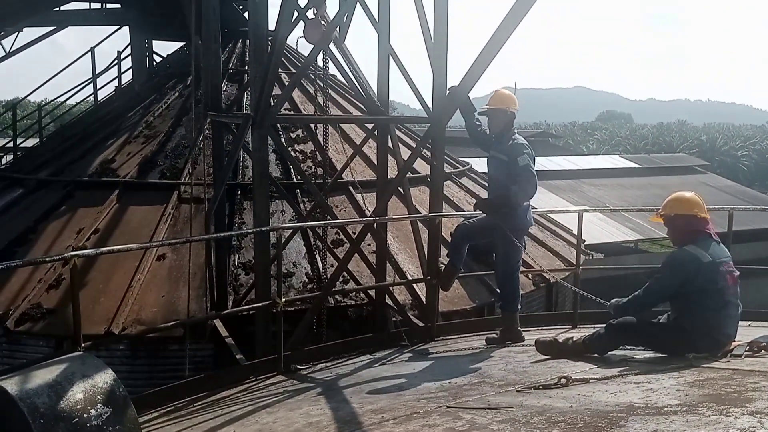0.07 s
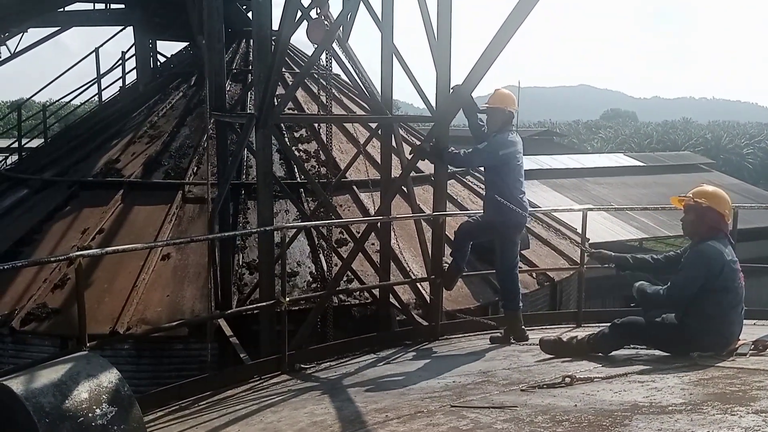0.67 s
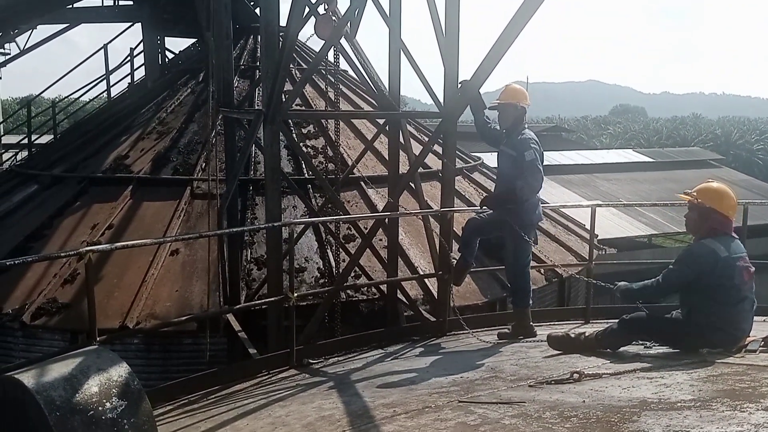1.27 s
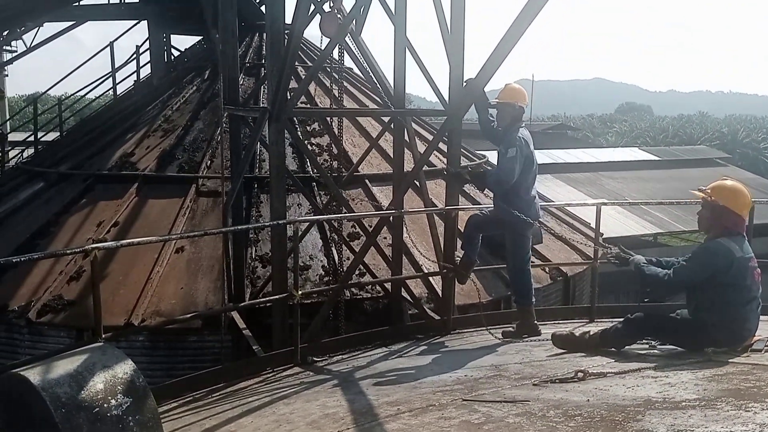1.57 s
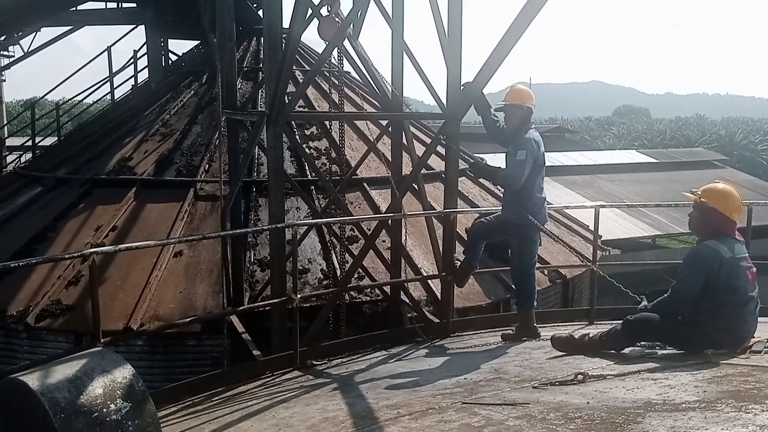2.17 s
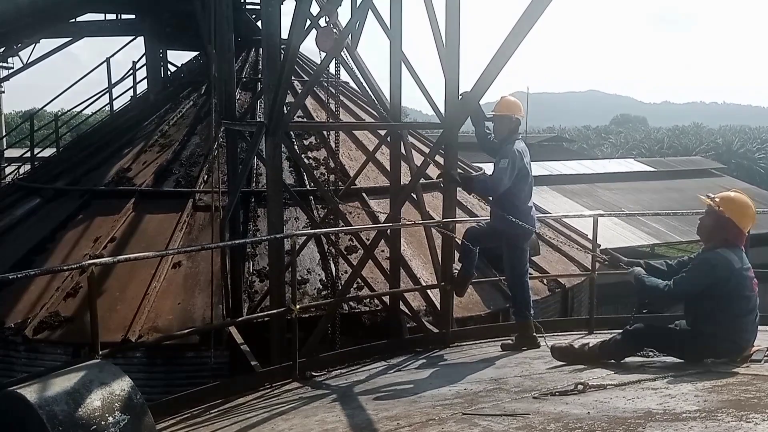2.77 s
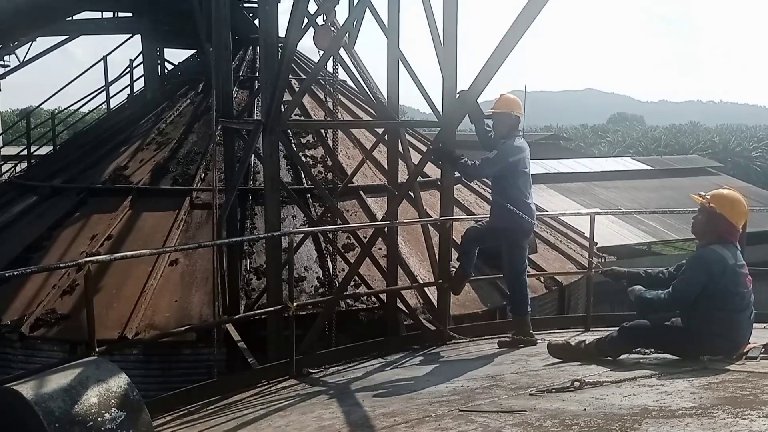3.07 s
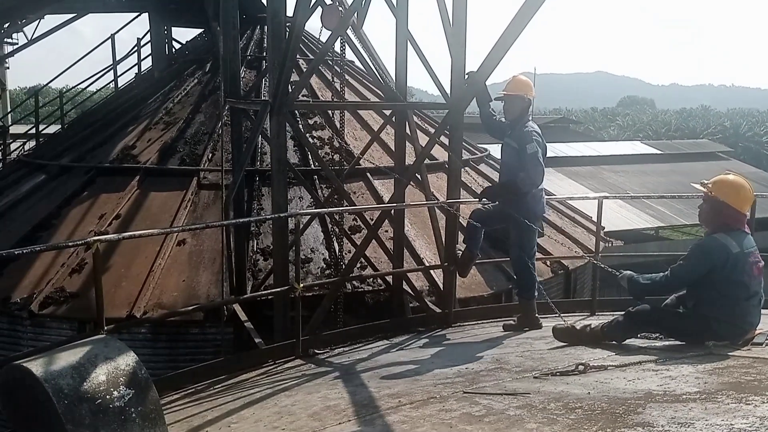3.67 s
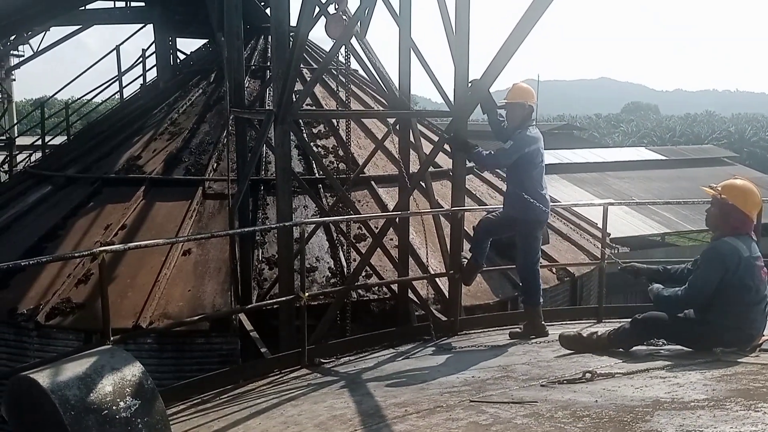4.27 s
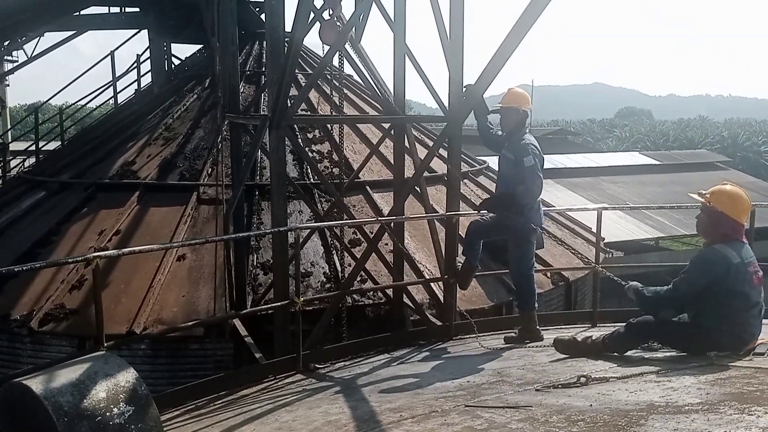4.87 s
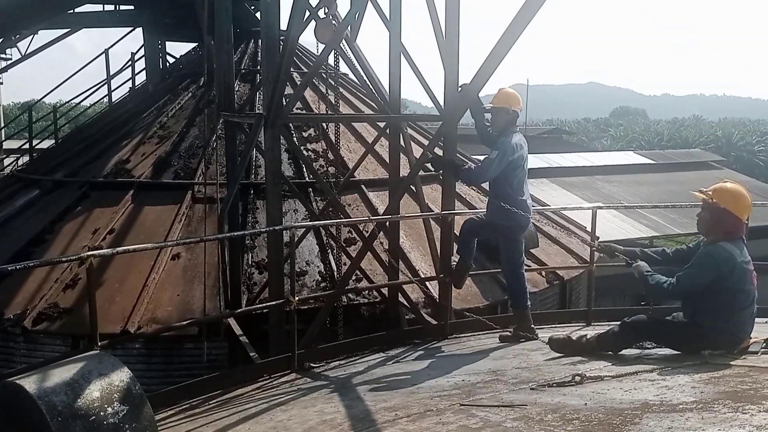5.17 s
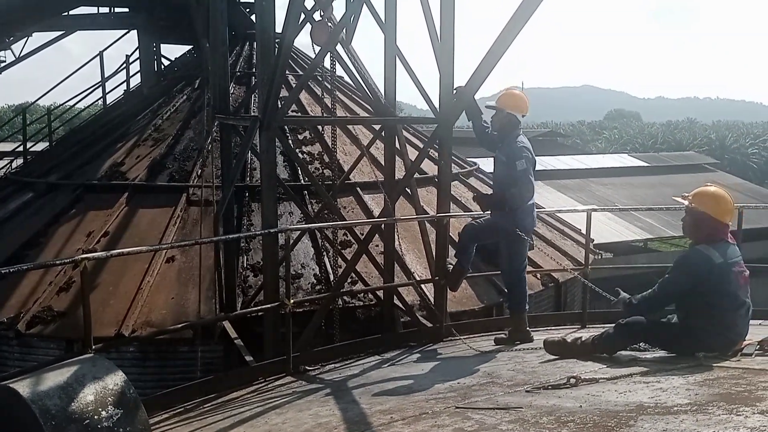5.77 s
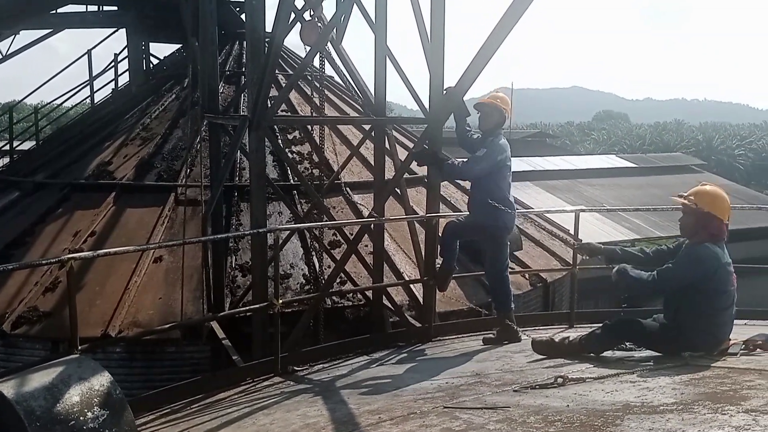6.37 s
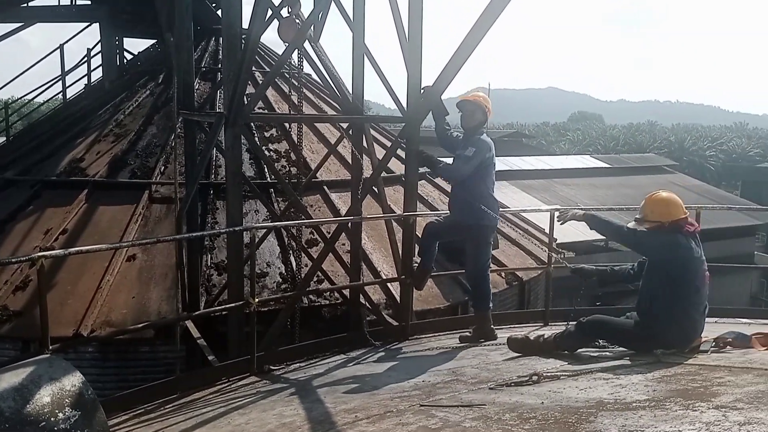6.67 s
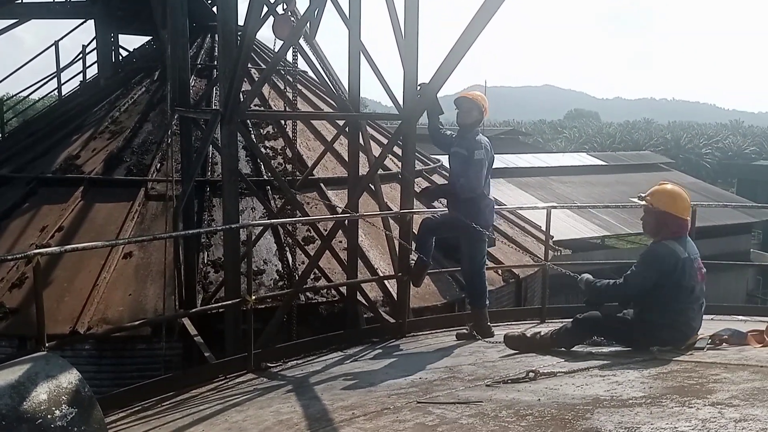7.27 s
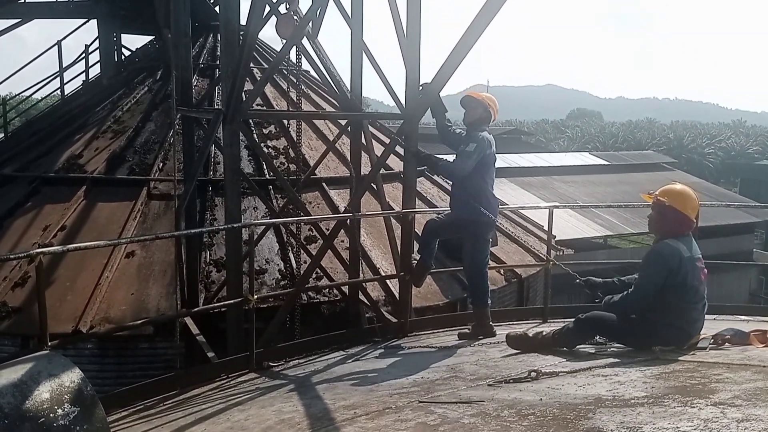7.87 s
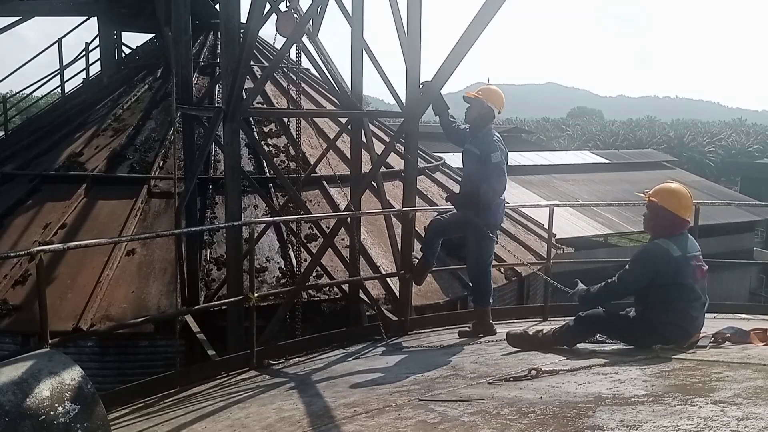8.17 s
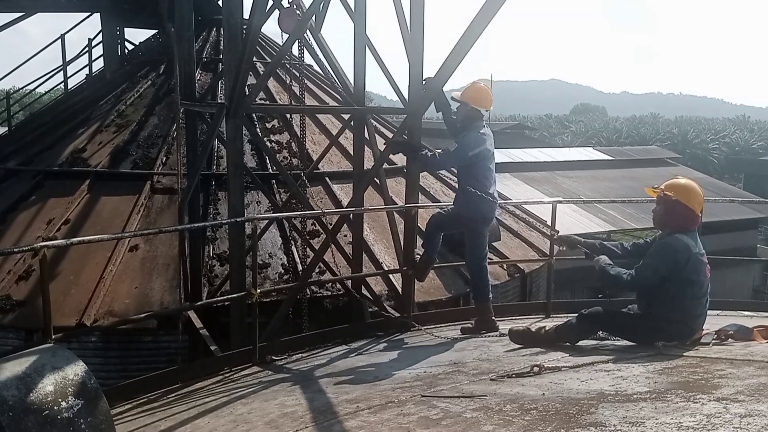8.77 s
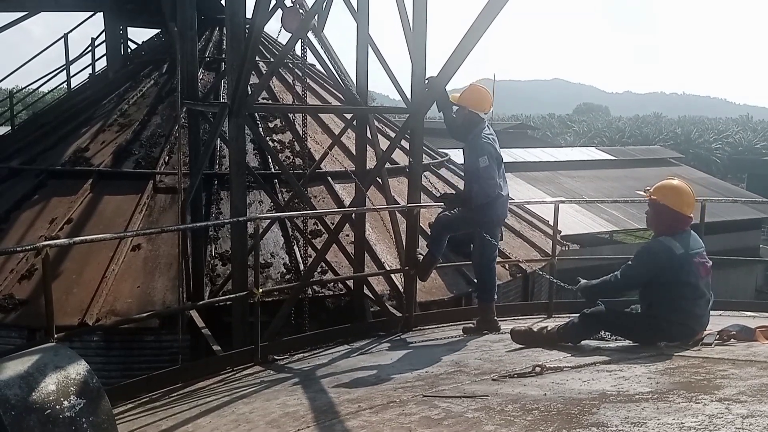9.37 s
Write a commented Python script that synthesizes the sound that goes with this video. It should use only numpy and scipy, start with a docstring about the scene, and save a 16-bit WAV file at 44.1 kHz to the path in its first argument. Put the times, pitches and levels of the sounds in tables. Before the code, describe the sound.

A chain hoist clatters in short bursts about once a second, with loose links clinking between pulls and faint machinery outdoors.

```python
"""A chain hoist on a steel rooftop, two workers hauling its hand chain about once a second.
In each pull a dense stream of links clatters over the wheel and shakes the housing;
between pulls the slack chain clinks and single links ring on.
One microphone in the open air, bumped by light wind, with machinery humming faintly far off."""
import sys
import numpy as np
from scipy import signal
from scipy.fft import rfft, irfft, next_fast_len
from scipy.io import wavfile
from scipy.ndimage import uniform_filter1d

SR = 44100
rng = np.random.default_rng(int(sys.argv[2]) if len(sys.argv) > 2 else 0)


def to_wav(sig):
    """Store sig (one row per channel, or 1-D mono) as 16-bit WAV at the path in sys.argv[1].

    Samples outside -1..1 are clipped; the rate is SR.
    """
    pcm = np.clip(np.atleast_2d(sig), -1, 1) * 32767
    pcm = np.round(pcm).astype(np.int16)
    wavfile.write(sys.argv[1], SR, pcm.T)  # frames by channels


N = 415422
TIME = np.arange(N) / SR

# Hauls on the chain. Each row: bite time, take-up before it, swell and haul, all in seconds; slowing in
# dB per second; then in dB the clatter, snap at the bite, sag after it, housing, low note and jingle
# (these three relative to the clatter) and growth of the jingle.
PULLS = [(-.35, 0.088, .008, 0.42, 169.5, -26.5, -24, 3, -3, -5, -2.5, 5),
         (.916, 0.036, .004, .31, 162, -29, -34, -2, -3, -4, -2, 5),
         (2.005, 0.12, .02, 0.4, 215, -26, -23, 3, -7.5, -6.5, -4, 8.5),
         (3.209, 0.088, 0.0032, 0.33, 209, -27.5, -17, 1, -4, -8.5, -21, -9.5),
         (4.284, .14, 0.012, 0.45, 108.5, -25, -18.5, 3.5, -8, -7.5, -17, 10),
         (5.449, 0.1, 0.044, 0.38, 207, -25.5, -26.5, 2.5, -7.5, -8, -14, 26),
         (6.653, .01, .005, 0.4, 171, -29, -17.5, 3.5, -3.5, -7.5, -6.5, 6),
         (7.819, .01, 0.0093, 0.38, 141, -26.5, -19.5, 3, -6, -7.5, -15.5, 9.5),
         (9.079, 0.09, 0.023, 0.45, 143, -25, -26.5, 0, -10.5, -8.5, -1, 20.5)]
# The crowd of weak modes in a link's low note, mid clatter and high jingle.
# Each row: frequency in Hz, relative spectral level in dB.
NOTE_WASH = [(2400, -67), (2800, -0.5), (2980, 11.5), (3250, 10), (3500, 7), (4200, -61.5)]
LINK_WASH = [(2800, -37.5), (3700, 5), (4500, 4.5), (6000, 9), (7300, 7.5), (7900, -1.5), (8600, -32),
             (12000, -27)]
JINGLE_WASH = [(6500, -25), (7900, -11), (8250, 18.5), (8900, -5.5), (9350, 7), (9750, -18), (10400, -7.5),
               (13000, -67)]
# A link's highest modes. Each row: frequency in Hz, relative level in dB.
JINGLE_MODES = [(8225, 19.5), (8360, -28), (8833, 27), (8925, -5), (9226, 16.5), (9270, -27), (9700, 14),
                (9781, -62)]


def amp(db):
    """Decibels to gain."""
    return 10 ** (np.asarray(db) / 20)


def rms_one(x):
    """Scale to rms 1."""
    return x / np.sqrt(np.mean(x ** 2) + 1e-20)


def energy_one(x):
    """Scale each row to energy 1."""
    return x / np.sqrt(np.sum(x ** 2, axis=-1, keepdims=True) + 1e-20)


def coloured(x, spectrum):
    """Causal (minimum-phase) filter that follows rows of frequency in Hz and gain in dB."""
    length = x.shape[-1]
    size = next_fast_len(length + SR // 20)
    hz, db = np.transpose(spectrum)
    log_hz = np.log(np.abs(np.fft.fftfreq(size, 1 / SR)) + 1)
    log_gain = np.log(amp(np.interp(log_hz, np.log(hz), db)))
    response = np.exp(np.conj(signal.hilbert(log_gain)))[:size // 2 + 1]
    return irfft(rfft(x, size) * response, size)[..., :length]


def background(hush_db=-55.5, swell_db=3.5, swell_s=.13, hiss_from_hz=2800):
    """Outdoor hush with the hums and whines of far machinery, each swelling and fading on the breeze."""
    # The rooftop's hush. Each row: frequency in Hz, relative spectral level in dB.
    hush = [(60, -42), (130, -0.5), (220, 1.5), (400, -2.5), (600, -8), (900, -8.5), (2500, -10.5),
            (3100, -14.5), (3700, -16.5), (7000, -19.5), (9000, -30), (11500, -54), (14000, -46),
            (15000, -76)]
    # Far machinery. Each row: pitch in Hz, bandwidth in Hz, base level in dB.
    whines = [(229.7, 16, -65), (270, 45, -65), (344, 24, -68.5), (430, 13, -73), (507, 17, -68),
              (597, 20, -70.5), (692, 15, -74.5), (3149, 50, -69), (4660, 9.3, -88), (5420, 17, -76)]
    # The treble hiss drifts. Each row: time in seconds, boost in dB.
    hiss = [(.4, 1), (1.6, 6.5), (3, 4), (3.9, 5), (6.1, 5), (7.3, 6), (8.5, 2.5), (9.42, 9)]
    air = amp(hush_db) * rms_one(coloured(rng.standard_normal(N), hush))
    for hz, width_hz, db in whines:
        resonance = signal.iirpeak(hz, hz / width_hz, fs=SR)
        tone = rms_one(signal.lfilter(*resonance, rng.standard_normal(N)))
        swell = np.interp(TIME / swell_s, np.arange(400), rng.standard_normal(400))
        air += amp(db + swell_db * swell) * tone
    treble = signal.sosfilt(signal.butter(1, hiss_from_hz, "high", fs=SR, output="sos"), air)
    treble_gain = amp(np.interp(TIME, *np.transpose(hiss)))
    return air + (treble_gain - 1) * treble


def wind(swing_db=2.5, swing_s=0.068):
    """Low, lumpy turbulence on the microphone port: a wandering breeze and a few gusts."""
    # Rumble at the port. Each row: frequency in Hz, relative spectral level in dB.
    rumble = [(15, -33), (25, -37), (62, 1.5), (92, 5.5), (162, -4.5), (194, -12), (279, -13), (300, -65),
              (390, -59), (660, -120)]
    # Gusts bump the microphone. Each row: peak time in seconds, level in dB, half-length in seconds.
    bumps = [(.01, -50.5, 0.17), (0.491, -40.5, 0.057), (1.366, -37.5, 0.04), (2.03, -43.5, 0.035),
             (2.672, -47, .03), (3.042, -41, 0.037), (3.918, -48, .07), (5.217, -35, 0.029),
             (5.312, -42, 0.043), (5.46, -40, 0.056), (5.698, -48.5, 0.11), (8.66, -49, .04)]
    # Light air between gusts. Each row: time in seconds, level in dB.
    light_air = [(0, -57), (3.2, -58.5), (4.1, -54.5), (5.9, -54), (6.6, -63.5), (7.8, -53.5), (8.7, -61.5),
                 (9.42, -63)]
    eddies = rms_one(coloured(rng.standard_normal(N), rumble))
    wander = np.interp(TIME / swing_s, np.arange(600), rng.standard_normal(600))
    breeze = amp(np.interp(TIME, *np.transpose(light_air)) + swing_db * wander)
    gusts = sum(amp(db) * np.exp(-np.minimum(((TIME - s) / half_s) ** 2, 20)) for s, db, half_s in bumps)
    eddy_rms = np.sqrt(uniform_filter1d(eddies ** 2, int(.09 * SR)))
    return np.hypot(breeze, gusts) * eddies / eddy_rms


def contacts(per_s, spread_db, even_s):
    """Random link-on-steel clicks, their power evened out to about 1 over even_s."""
    hits = rng.random(N) < per_s / SR
    clicks = hits * amp(spread_db * rng.standard_normal(N)) * rng.choice([-1, 1], N)
    return clicks / np.sqrt(np.abs(uniform_filter1d(clicks ** 2, int(even_s * SR) + 1)) + 1e-6)


def rings(modes, wash, ring_s, wash_s, shared_db, own_db, crack_db, partial_gap_hz=375, count=24):
    """One contact on each of many links: a crack, a quick wash, shared modes and its own partials."""
    size = SR // 3
    t = np.arange(size) / SR
    shared = np.zeros((count, size // 2 + 1))
    for hz, db in modes:
        shared[:, int(hz * size / SR)] = amp(db) * rng.standard_normal(count)
    own = (rng.random(shared.shape) < SR / size / partial_gap_hz) * rng.standard_normal(shared.shape)
    shared, own = energy_one(irfft(-1j * np.array([shared, own]), size) * amp(-60 * t / ring_s))
    tail = amp(-40) * amp(-60 * t / 0.09)   # thrown back by the steelwork around
    crowd = energy_one(rng.standard_normal((count, size)) * (amp(-60 * t / wash_s) + tail))
    crowd[:, 0] += amp(crack_db)
    contact = energy_one(coloured(crowd + amp(own_db) * own, wash))
    return energy_one(contact + amp(shared_db) * shared)


def struck(clicks, links, links_per_s=22, neighbours=.9):
    """The chain feeds past, so only a few neighbouring links touch at a time and the pitches shift."""
    out = np.zeros(N + links.shape[1])
    touching = np.floor(TIME * links_per_s + neighbours * rng.standard_normal(N)).astype(int) % len(links)
    for at in np.flatnonzero(np.abs(clicks) > 1e-4):
        out[at:at + links.shape[1]] += clicks[at] * links[touching[at]]
    return out[:N]


def pull_force(sag_at_s=0.12, sag_width_s=0.067, housing_lag_s=0.02, surge_s=0.026):
    """Each pull takes up slack, bites, sags, runs and slows: force on links, housing, low note, jingle."""
    # Slack sliding over the wheel: force in dB on links, housing, low note and jingle.
    take_up_db = [-39, -40, -50, -78]
    force = np.zeros((4, N))
    for s, take_up_s, swell_s, haul_s, slowing, db, _, sag_db, *balance in PULLS:
        housing_db, note_db, jingle_db, growth_db = balance
        before = (TIME > s - take_up_s) & (TIME < s)
        slide = np.sqrt(np.sin(np.pi * (s - TIME[before]) / take_up_s))
        force[:, before] += amp(take_up_db)[:, None] * slide
        during = (TIME >= s) & (TIME < s + haul_s + .5)
        t = TIME[during] - s
        sag = np.exp(-((t - sag_at_s) / sag_width_s) ** 2)   # the load checks the arm
        speed_db = -sag_db * sag - slowing * np.maximum(t - haul_s, 0)
        gathering_db = -growth_db * np.maximum(1 - t / (0.95 * haul_s), 0)
        links = speed_db + 0.11 * gathering_db
        housing = housing_db + 0.99 * speed_db - 11.5 * np.exp(-t / housing_lag_s)
        note = note_db + 0.7 * speed_db + 4 * np.exp(-(t / surge_s) ** 2)   # surges as the chain tightens
        jingle = jingle_db + 1.2 * speed_db + gathering_db
        force[:, during] += amp(db + np.array([links, housing, note, jingle])) * np.minimum(t / swell_s, 1)
    return force


def jerk_force(rise_s=0.0074, snap_settle_s=0.14, knock_settle_s=0.41):
    """Clinks, knocks and the snap of each bite run along the chain at once, then the links settle."""
    # Loose chain clinks. Each row: time in seconds, clatter in dB, low note and jingle in dB
    # relative to the clatter, settling time in seconds.
    clinks = [(.18, -38, -14, 1, 0.17), (0.396, -50.5, -10, 4, 0.22), (.551, -37, -5.5, -0.5, 0.17),
              (0.636, -38.5, -11, 2.5, 0.16), (0.8495, -45.5, 0, 7, 0.3), (1.361, -37.5, -3, -2.5, 0.28),
              (1.393, -40, -9, 9, 0.17), (1.4343, -28.5, 4.5, -20, 0.091), (1.8196, -40, -1, -15, 0.21),
              (2.055, -18.5, -10.5, -22, 0.14), (2.8375, -24.5, -16, 0, 0.17), (2.884, -30, -2, -13, 0.12),
              (3.13, -37.5, -20, -2, 0.21), (3.375, -20.5, -9, -12, 0.38), (3.743, -39.5, 1.5, -39, 0.09),
              (4.0048, -20.5, -5, -12, 0.26), (4.1824, -34.5, -3, -37, 0.24), (4.35, -18.5, -5, -28, 0.16),
              (4.455, -19.5, -27, -17.5, 0.45), (4.9206, -26.5, -4, -29, 0.18),
              (5.015, -38.5, -23, -27, 0.39), (5.184, -38, -33, -26, 0.13), (5.245, -44, -10, -32, 0.18),
              (5.504, -22.5, -4, -28, .15), (6.267, -20, -11, -8.5, 0.2), (6.376, -47, 0.5, -15, 0.66),
              (6.469, -22, -24, -9, 0.19), (6.514, -27, -4, -22, 0.17), (6.8434, -21, -22, -5, 0.071),
              (6.8816, -24, -10, -9.5, 0.54), (7.393, -23, -17, -7.5, 0.18), (7.431, -27, -4.5, -8, .12),
              (7.5123, -37.5, -5, -18, 0.15), (7.798, -37.5, -6, -15, 0.27), (8.194, -30, -15, -4, 0.27),
              (8.3255, -25.5, -4.5, -12.5, 0.096), (8.3735, -34.5, -3, -13, 0.18),
              (8.6344, -50, -16, -25, 0.17), (8.9355, -46.5, -1, -36, 0.42), (8.986, -32, -30, -10.5, 0.26),
              (9.112, -26, 3, -23, 0.079)]
    # A link knocks into a pocket of the wheel. Each row: time in seconds, strength in dB.
    knocks = [(0.7817, -46), (.8784, -37), (0.913, -30.5), (1.9124, -29.5), (2.218, -28.5), (2.86, -43.5),
              (5.3218, -41), (6.268, -47), (6.469, -27), (7.5976, -46.5), (8.84, -50.5)]
    knock_balance_db = np.array([-4, 2.5, -14.5, -24])   # links, housing, low note, jingle
    snap_note_db, snap_jingle_db, clink_housing_db = -1.5, -33.5, -32.5
    snaps = [(s, snap_db, snap_note_db, snap_jingle_db, snap_settle_s)
             for s, _, _, _, _, _, snap_db, *_ in PULLS if s > 0]
    jerks = [(s, db + np.array([0, clink_housing_db, note_db, jingle_db]), settle_s)
             for s, db, note_db, jingle_db, settle_s in clinks + snaps]
    jerks += [(s, db + knock_balance_db, knock_settle_s) for s, db in knocks]
    force, t = np.zeros((4, N + SR)), np.arange(SR // 2) / SR
    for s, levels, settle_s in jerks:
        at = int((s - rise_s) * SR)
        envelope = np.minimum(t / rise_s, 1) * amp(-60 * t / settle_s)
        force[:, at:at + len(t)] += amp(levels)[:, None] * envelope
    return force[:, :N]


def stray_rings(per_s=22, below_clatter_db=8, spread_db=2.5, low_hz=2200, high_hz=7200):
    """Running links swing free at random. Each row: start in seconds, pitch in Hz, level in dB."""
    when, pitch, size = rng.random((int(per_s * N / SR), 3)).T
    clatter_db = 20 * np.log10(pull_force()[0, (when * N).astype(int)] + 1e-6)
    level_db = clatter_db - below_clatter_db + spread_db * (2 * size - 1)
    return list(zip(when * N / SR, low_hz * (high_hz / low_hz) ** pitch, level_db))


def ringing_links(ring_cycles=870, rise_s=0.0099, twin_share=.04, twin_db=-5):
    """Single links hang free after a knock and sing on in two beating modes; high notes die first."""
    # Links left ringing. Each row: start in seconds, pitch in Hz, level in dB.
    knocked_links = [(.395, 8700, -37.5), (0.551, 8930, -28.5), (.552, 5840, -40), (0.635, 9000, -30),
                     (.636, 5940, -45), (0.784, 3160, -44.5), (0.954, 2930, -28), (1.22, 3030, -29),
                     (1.435, 3040, -46), (2.47, 2910, -35), (2.838, 6570, -39), (2.838, 8200, -27),
                     (2.86, 3570, -52), (4.004, 3060, -25.5), (4.005, 6465, -30), (4.006, 8160, -25),
                     (4.281, 3120, -23), (4.924, 3117, -35), (5.448, 2970, -34), (5.9, 2970, -31),
                     (6.268, 2998, -32), (6.267, 3490, -30.5), (6.267, 4670, -33), (6.267, 8400, -27),
                     (7.149, 3122, -39.5), (7.397, 3165, -37), (7.396, 4600, -31), (7.396, 8100, -22),
                     (7.82, 3200, -26), (8.331, 3133, -42), (8.33, 4930, -34), (8.636, 4460, -51)]
    links = knocked_links + [(s, hz, db) for s, hz, db in stray_rings() if db > -65]
    out, t = np.zeros(N + SR), np.arange(SR // 2) / SR
    for (s, hz, db), (phase, split) in zip(links, rng.random((len(links), 2))):
        twin_hz = hz * (1 + twin_share * (2 * split - 1))
        tone = np.sin(2 * np.pi * hz * t) + amp(twin_db) * np.sin(2 * np.pi * (twin_hz * t + phase))
        at = int(s * SR)
        out[at:at + len(t)] += amp(db - 60 * t * hz / ring_cycles) * np.minimum(t / rise_s, 1) * tone
    return out[:N]


def wheel_spin(force, lag_s=0.051, full_pull_db=-27):
    """The wheel takes a moment to come up to speed; 1 is a full pull."""
    keep = np.exp(-1 / (lag_s * SR))
    speed, _ = signal.lfilter([1 - keep], [1, -keep], force, zi=force[:1])
    return np.clip(speed / amp(full_pull_db), 1e-4, 1.2)


def hoist_body(clicks, spin):
    """A light touch rings only the wheel; housing and heavy frame answer as it spins up."""
    # Each part's clear modes and its wash of weak ones. Each row: frequency in Hz, relative level in dB.
    wheel_modes = [(1997, 0), (2056, 6), (2169, -11), (2309, 7), (2449, 0.5), (2562, -37), (2729, -3)]
    wheel_wash = [(1200, -46), (1700, -2), (2000, 1.5), (2350, 6.5), (2800, 2.5), (3600, -33)]
    housing_modes = [(1372, -35), (1453, -23), (1523, 2), (1663, 2.5), (1738, 3.5), (1878, -8)]
    housing_wash = [(900, -32), (1300, 2.5), (1480, 10.5), (1850, 2.5), (2300, -4.5), (3500, -50)]
    frame_modes = [(976, 0.5), (1190, 0)]
    frame_wash = [(210, -23), (350, -7), (600, -9.5), (800, -8), (950, -4), (1100, 11), (1300, 15.5),
                  (1800, -15)]
    wheel = rings(wheel_modes, wheel_wash, ring_s=0.13, wash_s=0.056,
                  shared_db=-5.5, own_db=16, crack_db=7)
    body = struck(clicks * amp(-2.5), wheel)
    housing = rings(housing_modes, housing_wash, ring_s=0.4, wash_s=0.12,
                    shared_db=-4.5, own_db=-2, crack_db=3)
    body += struck(clicks * amp(-4.5) * spin ** .45, housing)
    frame = rings(frame_modes, frame_wash, ring_s=0.15, wash_s=0.024,
                  shared_db=1, own_db=-0.5, crack_db=-7, partial_gap_hz=104.5)
    return body + struck(clicks * amp(-13.5) * spin ** .9, frame)


def dry_ticks(clicks):
    """Hard contacts add a dry tick at the very top."""
    # The tick's colour. Each row: frequency in Hz, relative spectral level in dB.
    tick_wash = [(7000, -23), (9600, 2.5), (10400, -3.5), (10900, 3.5), (12400, -14.5), (14000, -10),
                 (15200, 1)]
    tick = rings([], tick_wash, ring_s=.04, wash_s=.04, shared_db=0, own_db=-1, crack_db=3)
    return struck(clicks * amp(-9), tick)


def slack_links(on_note, on_links, on_jingle):
    """Slack links touch a few at a time: short, bright clinks over a low note that rings briefly."""
    # Low and middle modes of a free link. Each row: frequency in Hz, relative level in dB.
    note_modes = [(2137, -19), (2270, -13), (2998, 1), (3068, 1), (3149, 2.5), (3542, -8)]
    link_modes = [(3844, 2), (4370, 4.5), (4705, 7), (5130, 5), (5362, -12), (5771, -17), (6420, -12),
                  (6950, -13), (7400, 1)]
    own = dict(own_db=13, partial_gap_hz=800)
    note = rings(note_modes, NOTE_WASH, ring_s=0.22, wash_s=0.11, shared_db=0, crack_db=5, **own)
    links = rings(link_modes, LINK_WASH, ring_s=0.043, wash_s=0.12, shared_db=-4, crack_db=-15.5, **own)
    jingle = rings(JINGLE_MODES, JINGLE_WASH, ring_s=0.045, wash_s=.04,
                   shared_db=-14.5, crack_db=42, **own)
    parts = [(on_note, note), (on_links, links), (on_jingle, jingle)]
    return sum(struck(clicks, part, links_per_s=14, neighbours=.6) for clicks, part in parts)


def taut_links(on_note, on_links, on_jingle):
    """Links pulled tight make a dense, metallic clatter."""
    # Low and middle modes of a taut link. Each row: frequency in Hz, relative level in dB.
    note_modes = [(2950, -4), (2998, -8), (3149, 0), (3256, -7), (3396, -41), (3504, -28), (3542, -20),
                  (3596, 12)]
    link_modes = [(3865, 2.5), (3897, -29), (3989, -2), (4080, 11), (4355, 25.5), (4425, 20), (4554, -5),
                  (4893, -4.5), (5135, -27), (5356, -22), (5480, -27), (5555, -35), (5770, -38), (5991, 22),
                  (6325, -4), (6422, 28), (6486, -21), (6766, -21), (6879, -14), (7122, -18)]
    note = struck(on_note, rings(note_modes, NOTE_WASH, ring_s=0.2, wash_s=.09,
                                 shared_db=-3.5, own_db=-12.5, crack_db=-8.5))
    links = struck(on_links, rings(link_modes, LINK_WASH, ring_s=0.15, wash_s=0.11,
                                   shared_db=-15.5, own_db=-2, crack_db=-1))
    jingle = struck(on_jingle, rings(JINGLE_MODES, JINGLE_WASH, ring_s=0.05, wash_s=0.057,
                                     shared_db=10.5, own_db=-3.5, crack_db=-27))
    return note + links + jingle


def hoist():
    """Running and jerking links excite the same steel: chain, wheel, housing and frame."""
    pull = pull_force() * amp([[0], [-.5], [-1.3], [-1]])   # links, housing, low note, jingle
    jerk = jerk_force() * amp([[-1.5], [-1.5], [-1], [0]])
    spin = wheel_spin(pull[0])
    # a slow chain tinkles link by link, a fast one is a dense rush
    running = pull * contacts(per_s=210 + 400 * spin, spread_db=1.5, even_s=.025)
    jerking = jerk * contacts(per_s=1100, spread_db=0, even_s=0.0059)
    on_links, on_housing, on_note, on_jingle = running + jerking
    on_chain = np.array([on_note, on_links, on_jingle])
    tension = np.clip(pull[0] / amp(-26), 0, .88)
    taut = taut_links(*on_chain * np.sqrt(tension))
    slack = slack_links(*on_chain * np.sqrt(1 - tension))
    clatter, _, _, jingle = pull + jerk + 1e-6
    hardness = np.minimum(jingle / clatter, 1) ** 0.9   # hard contacts have more jingle for their clatter
    ticks = dry_ticks(on_links * hardness)
    return hoist_body(on_housing, spin) + taut + slack + ticks


def scene():
    """Hoist, wind, far machinery and ringing links at one microphone on the roof."""
    return (hoist() + wind() + background() + ringing_links())[None]


def record(dry, cutoff_hz=15500):
    """The recorder cuts the top steeply."""
    return signal.sosfilt(signal.ellip(10, .2, 80, cutoff_hz, fs=SR, output="sos"), dry)


dry = scene()
out = record(dry)
to_wav(out)
```